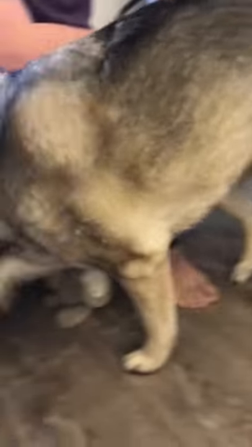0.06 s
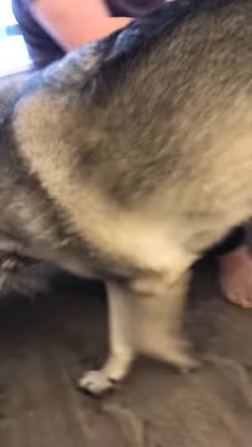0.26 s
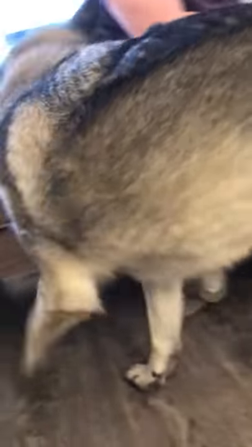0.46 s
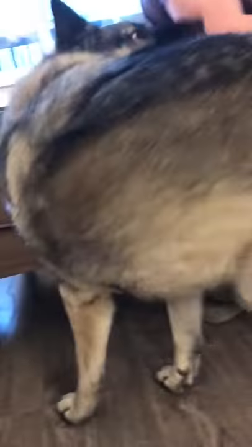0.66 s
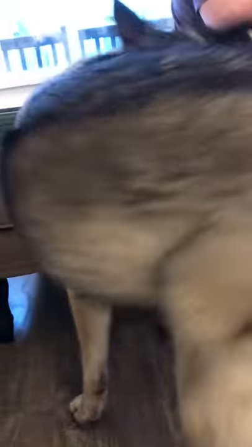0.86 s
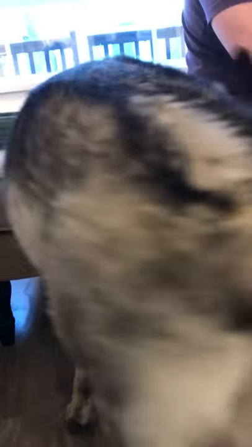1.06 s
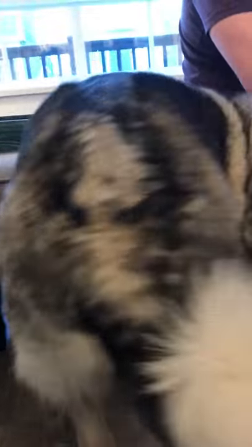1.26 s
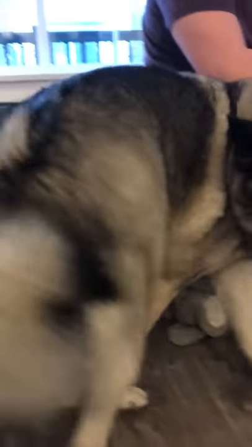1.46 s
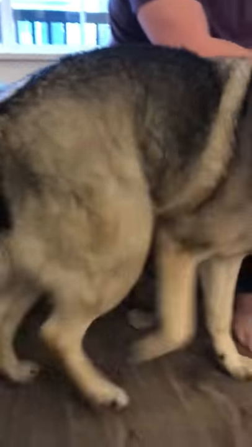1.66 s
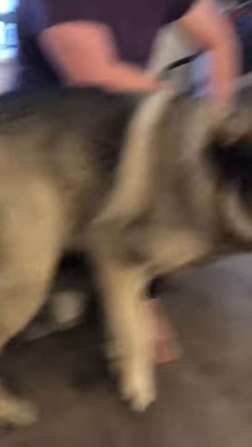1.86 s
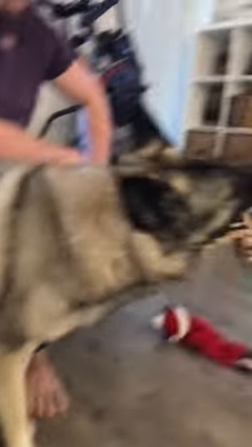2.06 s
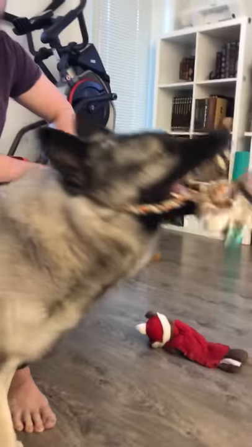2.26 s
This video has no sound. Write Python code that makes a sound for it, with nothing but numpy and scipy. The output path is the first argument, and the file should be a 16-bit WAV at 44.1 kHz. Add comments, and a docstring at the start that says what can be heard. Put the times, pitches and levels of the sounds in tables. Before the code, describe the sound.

Close by, a dog's claws tap on hard floorboards in several quick, irregular clusters, with a few dull paw thumps and tiny scrapes. The clicks ring briefly in a bare room, over faint hum and hiss.

```python
"""A dog shuffles on a laminate floor in a bare living room, close to a phone.
At first: low room hum, hiss, a thin coat rustle, and hard walls still ringing from an earlier tap.
From 0.17 s claws tap and the boards buzz; heavier paws thump their low modes, then claws skid.
More flurries follow near 0.6, 1.1, 1.5 and 1.8 s, each ringing on in the walls.
A faint tone fades in around the last tap at 2 s, and one weak skid ends the scene."""
import sys
import numpy as np
from scipy import signal
from scipy.io import wavfile
from scipy.ndimage import uniform_filter1d

SR = 44100
rng = np.random.default_rng(int(sys.argv[2]) if len(sys.argv) > 2 else 0)


def waveform_to_disk(signal):
    """Save audio, clipped to [-1, 1], as 16-bit WAV at the path in sys.argv[1]."""
    frames = np.transpose(np.atleast_2d(signal))
    scaled = np.clip(frames, -1, 1) * 32767
    samples = np.round(scaled).astype(np.int16)
    wavfile.write(sys.argv[1], SR, samples)


N = 101429
LEAD_SAMPLES = 8820  # room for a tap before t = 0
NOISE_EDGE_HZ, PHONE_EDGE_HZ = 15900, 16900


def amp(db):
    return 10 ** (np.asarray(db) / 20)


def unit_rms(x):
    return x / np.sqrt(np.mean(x ** 2) + 1e-20)


def curve_at(points, hz):
    """Interpolate over log frequency."""
    point_hz, value = np.transpose(points)
    return np.interp(np.log(hz + 1), np.log(point_hz + 1), value)


def add(mix, start_s, sound):
    part = mix[LEAD_SAMPLES + round(start_s * SR):][:len(sound)]
    part += sound[:len(part)]


def low_pass(x, hz):
    return signal.oaconvolve(x, signal.firwin(511, hz, window=("kaiser", 9), fs=SR), "same")


# Taps: t/s, knock level/dB, panel level/dB, claw level/dB, tip level/dB, panel f/Hz, claw f/Hz
TAPS = [(-0.1499, -36.5, -24.5, -23, -39, 3780, 7300), (0.1681, -59, -43, -42.5, -45, 3740, 6400),
        (0.234, -31.5, -28.5, -10, -38, 3520, 6020), (0.2348, -26.5, -15.5, -7.5, -10.5, 2550, 9240),
        (0.27, -38, -22.5, -22.5, -24, 4480, 8400), (0.335, -38, -33, -24.5, -29, 2830, 9200),
        (0.5966, -37, -28.5, -24, -21, 4520, 7640), (0.6203, -22, -13, -7, -22.5, 5470, 6480),
        (0.622, -30, -21.5, -19.5, -30, 3070, 8100), (0.6423, -36, -24, -24, -29, 4200, 7500),
        (0.7083, -54, -37.5, -37.5, -43, 3850, 7100), (0.7501, -42.5, -41.5, -48, -53, 2700, 5500),
        (0.8332, -44.5, -31.5, -26, -30, 3600, 9100), (0.8981, -41.5, -37, -52, -55, 2810, 5700),
        (0.9546, -46, -34.5, -31.5, -35.5, 3200, 6300), (1.0667, -35, -22.5, -17.5, -22, 5400, 8850),
        (1.0682, -34.5, -21, -16.5, -21, 3960, 9500), (1.085, -37, -32, -26.5, -31, 4100, 7570),
        (1.144, -41.5, -45, -41, -59, 3780, 6900), (1.2126, -46, -37, -36.5, -44, 2700, 5200),
        (1.2253, -56, -37, -41, -47, 2700, 5200), (1.2617, -58, -44, -41.5, -47, 3800, 9100),
        (1.5193, -39, -19.5, -9, -15, 2650, 8320), (1.521, -29, -19.5, -19, -18, 4730, 7940),
        (1.5287, -37, -14.5, -11.5, -12.5, 4730, 7750), (1.5677, -37, -31, -38, -50, 3800, 5640),
        (1.602, -39.5, -41, -54, -56, 3800, 6800), (1.818, -33, -21, -18.5, -16.5, 4130, 7000),
        (1.8277, -45.5, -34, -26, -29, 4470, 8420), (1.831, -43, -35, -27, -33, 4500, 6800),
        (1.919, -46.5, -33.5, -33, -63, 2940, 5300), (2.0284, -34.5, -24.5, -15.5, -17.5, 5030, 6400)]
# Knock, panel, claw and tip bands: contact/s, buzz level/dB re band, buzz t60/s
TAP_BANDS = [(.0005, -10, .022), (.00025, -11, .024), (.0002, -13, .016), (.00018, -17, .01)]
KNOCK_HZ, TIP_HZ, SPOT_DETUNE = 1400, 12400, .03


def claw_taps():
    """Each claw gives a short soft-edged crack in four bands; the board buzzes after it."""
    cracks, buzzes = np.zeros((2, N + LEAD_SAMPLES))
    t = np.arange(1500) / SR
    for start_s, *levels_db, panel_hz, claw_hz in TAPS:
        detune = 1 + SPOT_DETUNE * rng.standard_normal(4)
        bands_hz = detune * (KNOCK_HZ, panel_hz, claw_hz, TIP_HZ)
        grit = rng.standard_normal(len(t))
        for db, hz, (contact_s, buzz_db, t60_s) in zip(levels_db, bands_hz, TAP_BANDS):
            touch = (t / contact_s) ** 2 * np.exp(2 - 2 * t / contact_s)
            crack = touch * np.sin(2 * np.pi * hz * t)
            crack -= touch * crack.sum() / touch.sum()  # zero mean
            buzz = unit_rms(np.convolve(grit, crack[:200])[:len(t)])
            rise = np.minimum(t / contact_s / 4, 1)
            add(cracks, start_s, amp(db) * crack)
            add(buzzes, start_s, amp(db + buzz_db - 60 * t / t60_s) * rise * buzz)
    return cracks, buzzes


# Wall decay: f/Hz, t60/s
WALL_T60 = [(300, 0.72), (3500, 0.65), (7000, 0.57), (14000, 0.47)]
# Tail spectrum: f/Hz, relative level/dB
WALL_COLOUR = [(300, -2.5), (1000, 3), (3100, 4), (3900, 6.5), (4600, 1.5), (5500, 2), (7000, -2.5),
               (8500, -5.5), (12500, -10), (16000, 1.5)]
# Wall response as the dog turns and moves: t/s, level/dB
WALL_LEVEL = [(-.15, -6.5), (.25, -11), (.33, -13), (.6, -14), (0.841, -8.5), (1.07, -8), (1.52, -8),
              (1.82, -10.5), (2.03, -9)]
WALL_DELAY_S, WALL_RISE_S, CROSSFADE_HZ = .002, .004, 1.099


def wall_ring(paws):
    """Hard walls ring on: three noise tails, taken in turn, each dying faster in the treble."""
    t = np.arange(len(paws)) / SR
    level = amp(np.interp(t - LEAD_SAMPLES / SR, *np.transpose(WALL_LEVEL)))
    out = np.zeros(len(paws))
    for k in range(3):
        hz, frame_s, noise = signal.stft(rng.standard_normal(SR), SR, nperseg=256)
        colour_db = curve_at(WALL_COLOUR, hz)[:, None]
        decay_db = 60 * frame_s / curve_at(WALL_T60, hz)[:, None]
        tail = signal.istft(noise * amp(colour_db - decay_db), SR, nperseg=256)[1]
        age_s = np.maximum(np.arange(len(tail)) / SR - WALL_DELAY_S, 0)
        tail *= 1 - np.exp(-age_s / WALL_RISE_S)
        share = np.sqrt(2 / 3) * np.cos(2 * np.pi * CROSSFADE_HZ * t + k * np.pi / 3)  # equal power
        out += signal.fftconvolve(paws * level * share, tail / np.linalg.norm(tail))[:len(paws)]
    return low_pass(out, NOISE_EDGE_HZ)


# Hum and hiss spectrum: f/Hz, relative density level/dB
ROOM_SPECTRUM = [(25, -45.5), (50, 7.5), (110, -5.5), (250, -4.5), (330, -10.5), (450, -17), (1000, -22),
                 (2000, -27), (3800, -32.5), (7000, -32), (10400, -38.5), (12500, -37.5), (16000, -42)]
ROOM_RMS_DB, PATCH_RMS_DB = -57.5, 1.5


def room_noise():
    """Low room hum and microphone hiss, with drifting patches in the spectrum."""
    frames, hz = N // 256 + 5, np.fft.rfftfreq(1024, 1 / SR)
    real, imag, patches = rng.standard_normal((frames, len(hz), 3)).T
    patches = uniform_filter1d(patches, size=6, axis=0)  # over frequency
    patches = unit_rms(uniform_filter1d(patches, size=10, axis=1))  # over time
    shape_db = curve_at(ROOM_SPECTRUM, hz)[:, None] + PATCH_RMS_DB * patches
    noise = signal.istft((real + 1j * imag) * amp(shape_db), nperseg=1024, noverlap=768)[1][:N]
    return amp(ROOM_RMS_DB) * unit_rms(low_pass(noise, NOISE_EDGE_HZ))


# Rustle envelope: t/s, level/dB
COAT_LEVEL = [(.45, -72), (0.599, -65), (1.15, -67), (1.4, -77.5), (1.75, -62.5), (2.05, -86)]
COAT_HIGH_PASS_HZ = 7300


def coat_rustle():
    """Coat and pads brush as the dog turns: a thin high hiss."""
    high_pass = signal.butter(2, COAT_HIGH_PASS_HZ, "high", fs=SR)
    hiss = signal.lfilter(*high_pass, rng.standard_normal(N))
    level = amp(np.interp(np.arange(N) / SR, *np.transpose(COAT_LEVEL)))
    return level * unit_rms(low_pass(hiss, NOISE_EDGE_HZ))


# Paw falls: t/s, level/dB, pitch factor
THUMPS = [(.234, -12, 1.054), (.272, -22, 0.92), (0.351, -35.5, 0.84), (1.067, -29, 1.12),
          (1.519, -24, 1.014), (1.56, -34, 0.99), (1.815, -31.5, 1.11), (2.025, -47, 0.98)]
# Low board modes: f/Hz, relative level/dB, t60/s
BOARD_MODES = [(53.7, -28, 0.7), (171.9, 0.5, 0.083), (153.1, -8.5, 0.15), (300.5, -9, 0.1),
               (441, -17.5, 0.082), (554, -10, 0.048)]
THUMP_RISE_S = .016


def paw_thumps():
    """The weight of a paw rings the low modes of the boards."""
    out, t = np.zeros(N + LEAD_SAMPLES), np.arange(0, .4, 1 / SR)
    mode_hz, mode_db, t60_s = np.transpose(BOARD_MODES)[:, :, None]
    decay = amp(mode_db - 60 * t / t60_s)
    rise = 1 - np.exp(-t / THUMP_RISE_S)
    for start_s, db, pitch in THUMPS:
        ring = (decay * np.sin(2 * np.pi * mode_hz * pitch * t)).sum(0)
        add(out, start_s, amp(db) * rise * ring / abs(ring).max())
    return out


# Skids: t/s, length/s, level/dB, centre f/Hz
SKIDS = [(0.311, 0.0069, -44, 4200), (0.331, 0.014, -39.5, 5400), (0.566, 0.083, -48.5, 7000),
         (0.765, 0.0089, -52, 3480), (0.835, 0.018, -39.5, 5030), (1.06, 0.017, -35.5, 4960),
         (1.191, 0.039, -48, 5000), (1.289, 0.013, -44, 4640), (1.679, 0.029, -44, 5400),
         (1.9, 0.0045, -53, 5500), (2.261, 0.055, -62, 3000)]
# Scraped board resonances: f/Hz, width/Hz, level/dB re broad band
SCRAPE_MODES = [(3630, 620, 1), (6020, 1300, -1)]
SLIPS_PER_S, SLIP_SPREAD_DB, SKID_Q = 6500, 3.8, 1 / 1.7


def claw_skids():
    """Dense tiny slips drive a broad band and the board's resonances, swelling and stopping short."""
    out, t = np.zeros(N + LEAD_SAMPLES), np.arange(4000) / SR
    for start_s, length_s, db, centre_hz in SKIDS:
        chance, size, direction = rng.random((len(t), 3)).T
        slip_db = -SLIP_SPREAD_DB * np.log(size + .0007)
        slips = (chance < SLIPS_PER_S / SR) * amp(slip_db) * np.sign(direction - .5)
        stroke = np.sin(np.pi * np.clip(t / length_s, 0, 1) ** 1.5) ** .7
        band = signal.iirpeak(centre_hz, SKID_Q, SR)
        broad = signal.lfilter(*band, signal.lfilter(*band, unit_rms(slips) * stroke))
        broad *= np.sqrt(SR / 2 / centre_hz)  # bandwidth make-up gain
        ring = sum(amp(mode_db) * signal.lfilter(*signal.iirpeak(hz, hz / width_hz, SR), broad)
                   for hz, width_hz, mode_db in SCRAPE_MODES)
        add(out, start_s, amp(db) * (broad + ring) / 2)
    return out


# Late tone: f/Hz, level/dB
TONE = [(510, -67)]
TONE_START_S, TONE_FULL_S = 1.95, 2.15


def faint_tone():
    """One sine fades in and holds."""
    t = np.arange(N) / SR
    fade = np.interp(t, (TONE_START_S, TONE_FULL_S), (0, 1))
    return fade * sum(amp(db) * np.sin(2 * np.pi * hz * t) for hz, db in TONE)


def scene():
    """Mono mix; only cracks, skids and thumps excite the walls."""
    cracks, buzzes = claw_taps()
    paws = cracks + claw_skids() + paw_thumps()
    steps = (paws + buzzes + wall_ring(paws))[LEAD_SAMPLES:]
    return (steps + room_noise() + coat_rustle() + faint_tone())[None]


def record(dry):
    """The band limit of the phone."""
    return low_pass(dry[0], PHONE_EDGE_HZ)[None]


dry = scene()
out = record(dry)
waveform_to_disk(out)
```